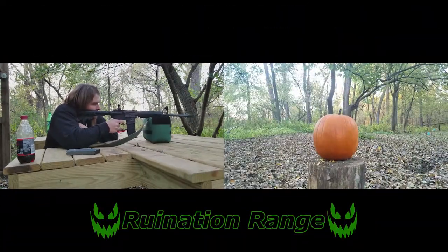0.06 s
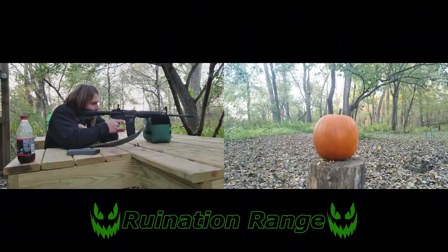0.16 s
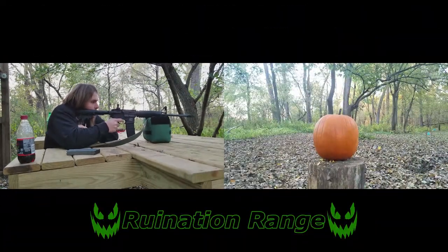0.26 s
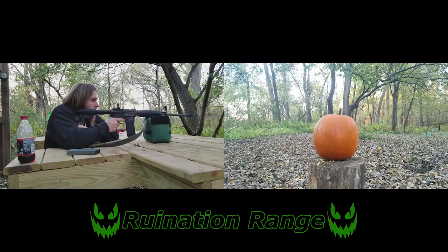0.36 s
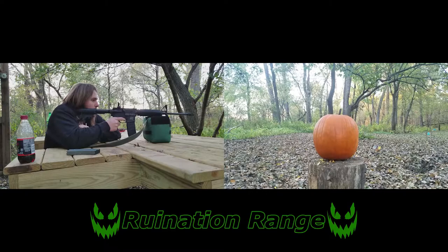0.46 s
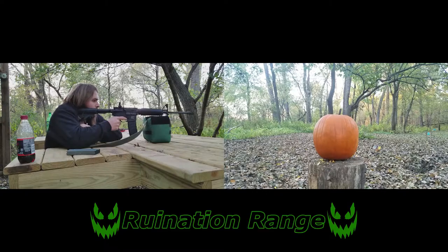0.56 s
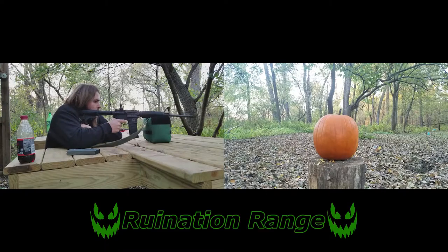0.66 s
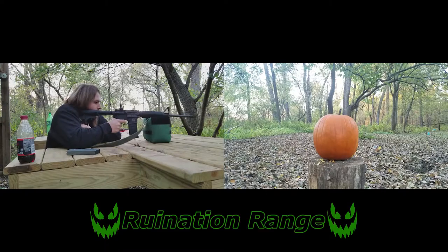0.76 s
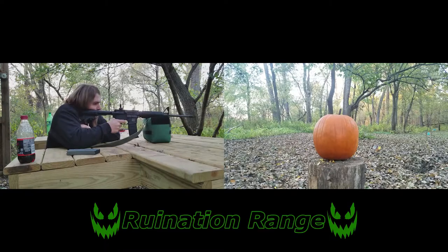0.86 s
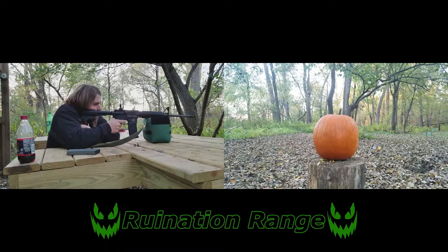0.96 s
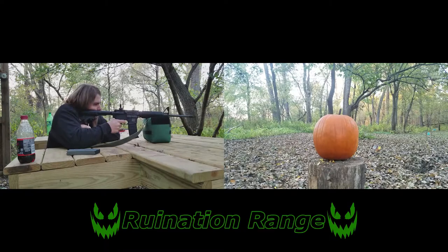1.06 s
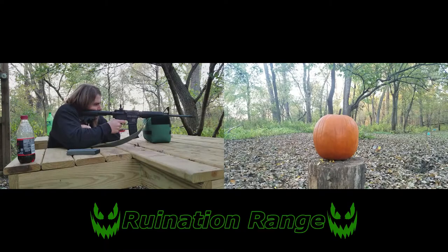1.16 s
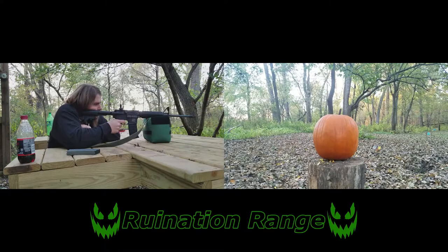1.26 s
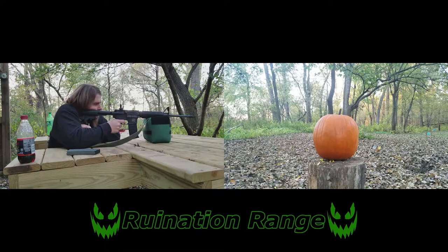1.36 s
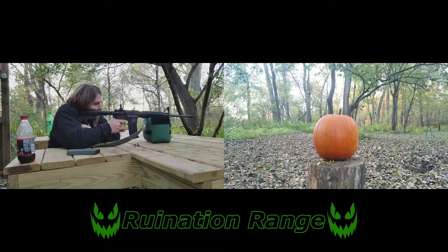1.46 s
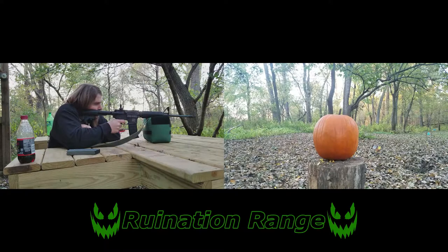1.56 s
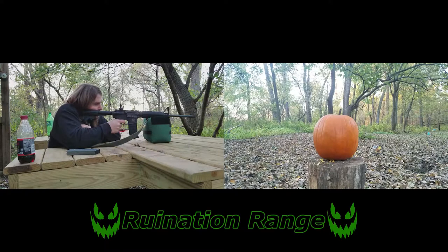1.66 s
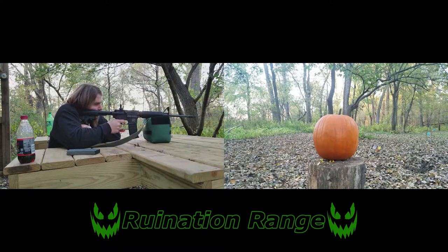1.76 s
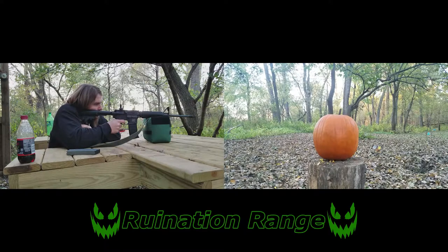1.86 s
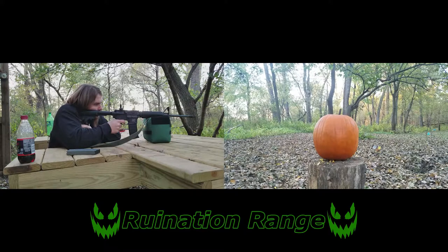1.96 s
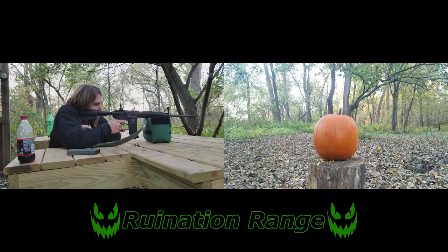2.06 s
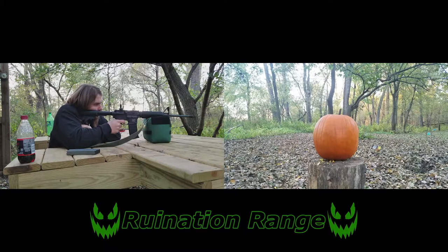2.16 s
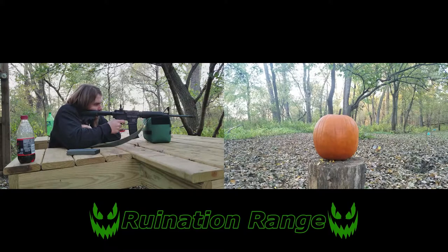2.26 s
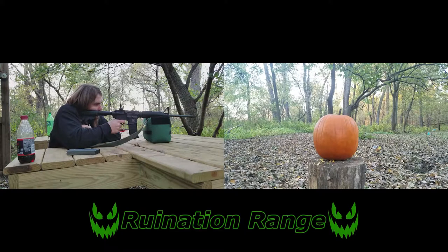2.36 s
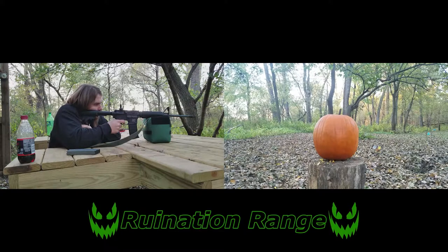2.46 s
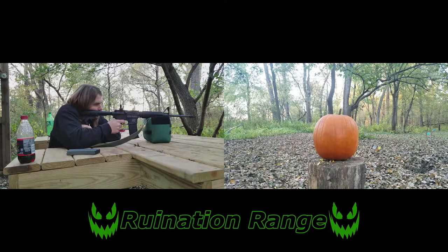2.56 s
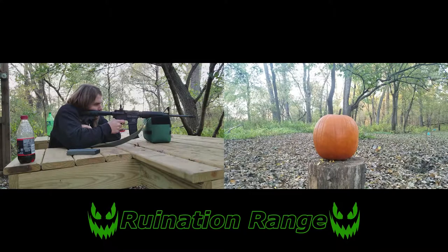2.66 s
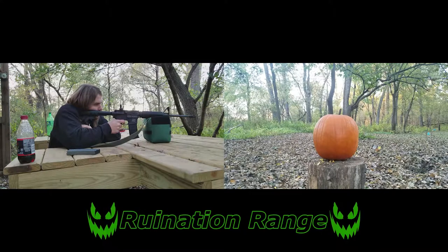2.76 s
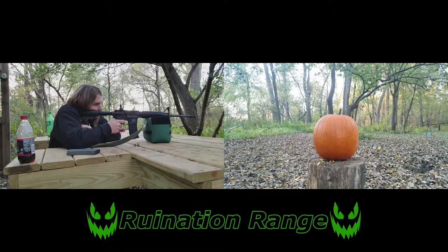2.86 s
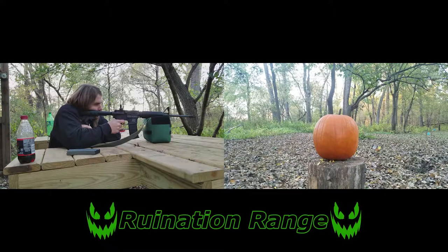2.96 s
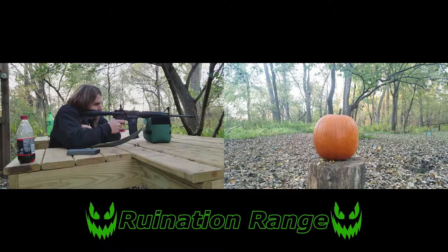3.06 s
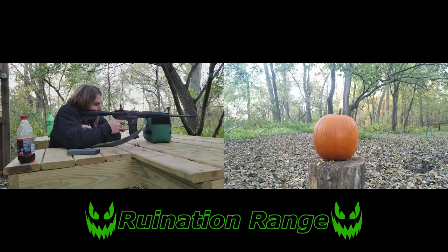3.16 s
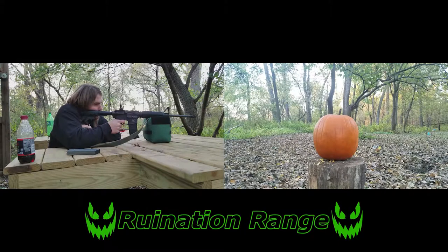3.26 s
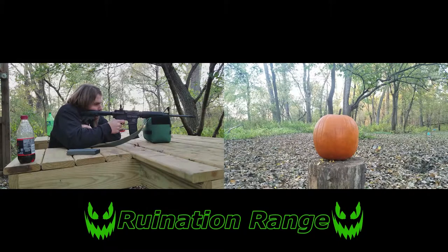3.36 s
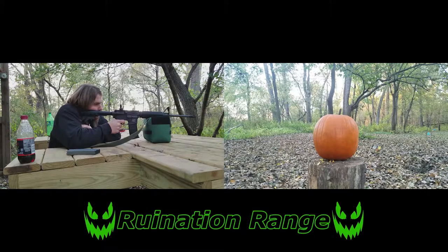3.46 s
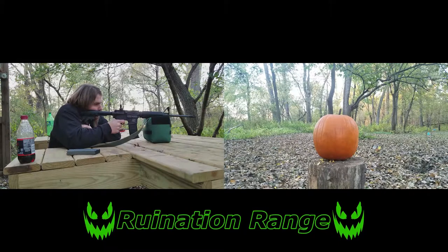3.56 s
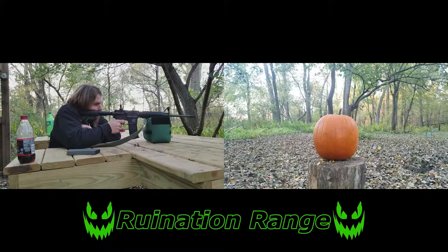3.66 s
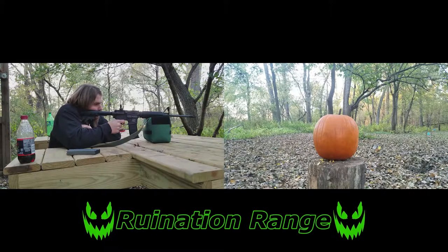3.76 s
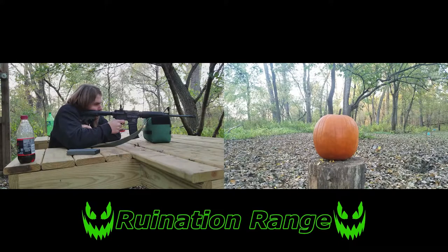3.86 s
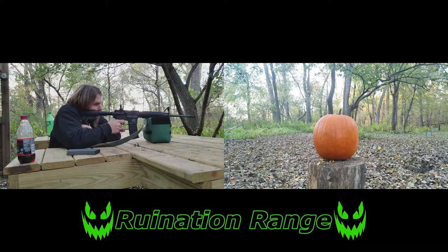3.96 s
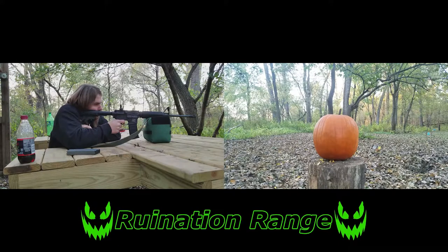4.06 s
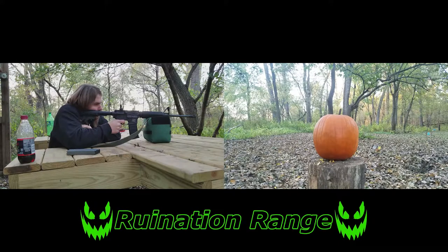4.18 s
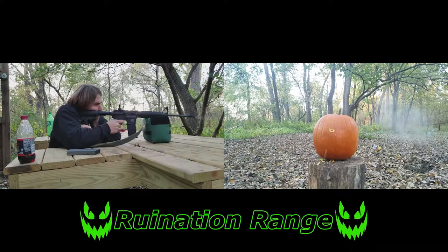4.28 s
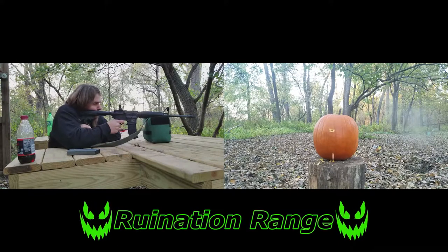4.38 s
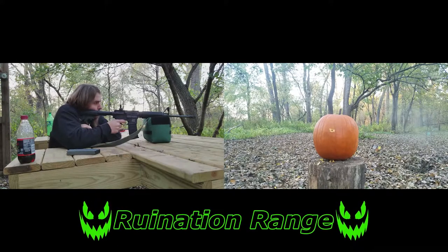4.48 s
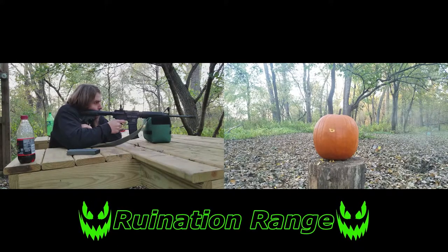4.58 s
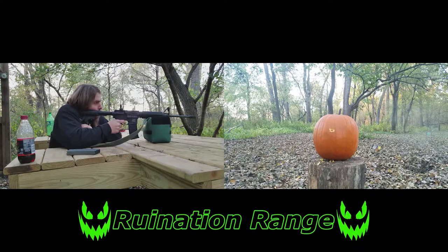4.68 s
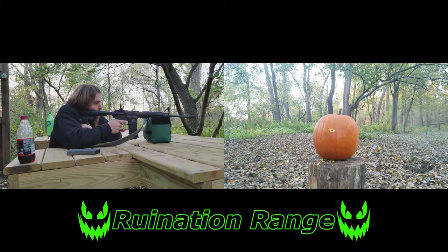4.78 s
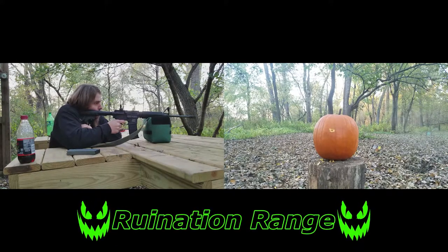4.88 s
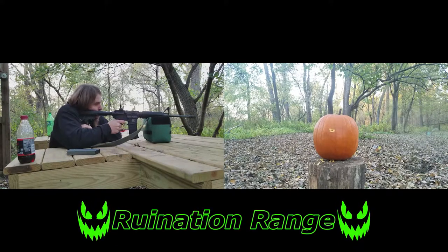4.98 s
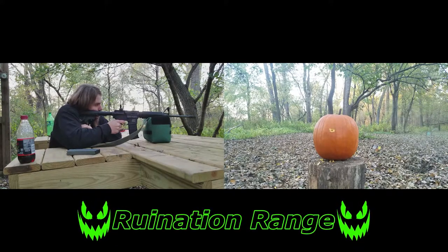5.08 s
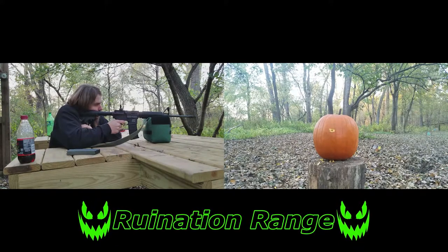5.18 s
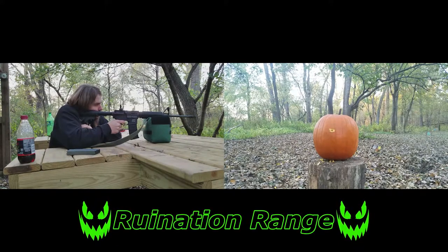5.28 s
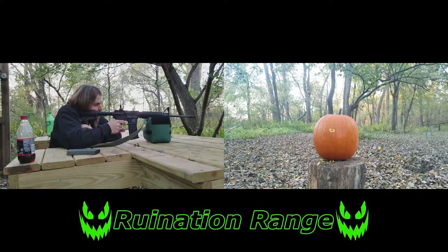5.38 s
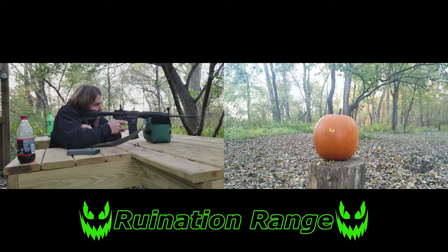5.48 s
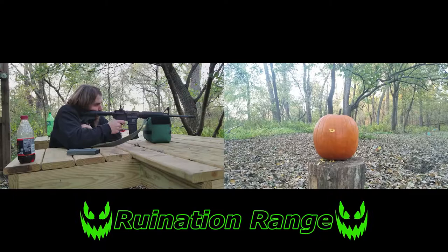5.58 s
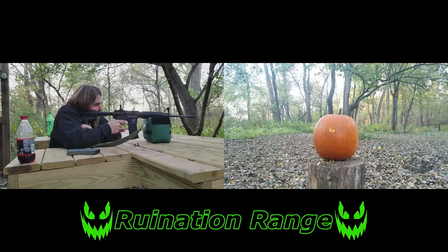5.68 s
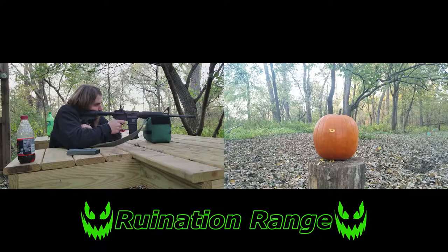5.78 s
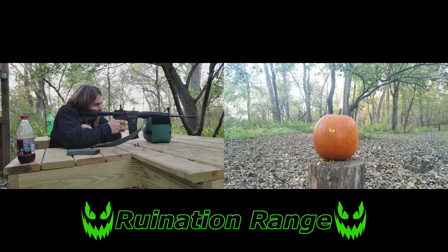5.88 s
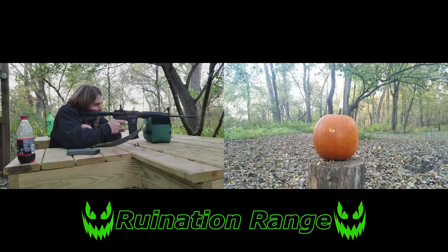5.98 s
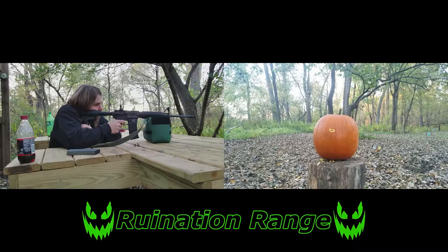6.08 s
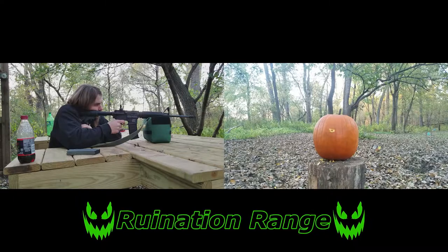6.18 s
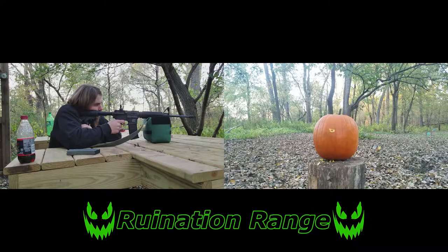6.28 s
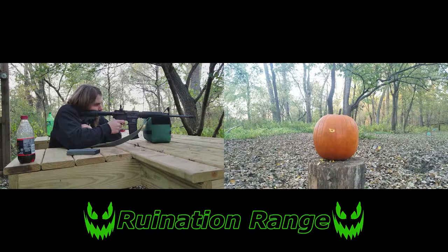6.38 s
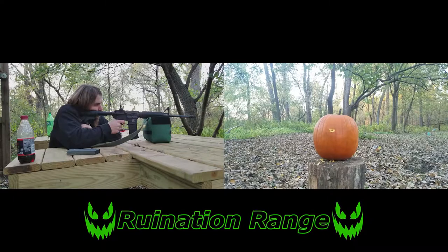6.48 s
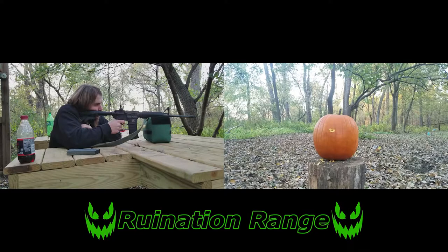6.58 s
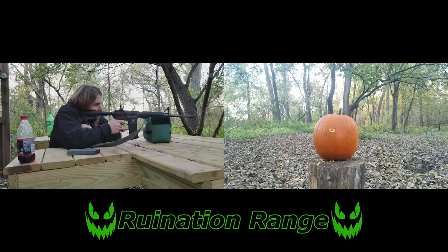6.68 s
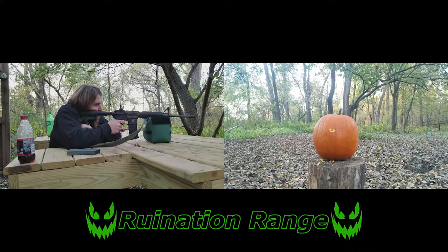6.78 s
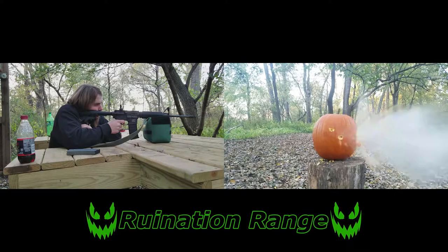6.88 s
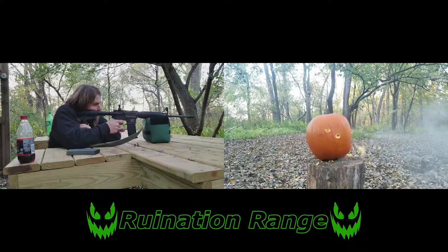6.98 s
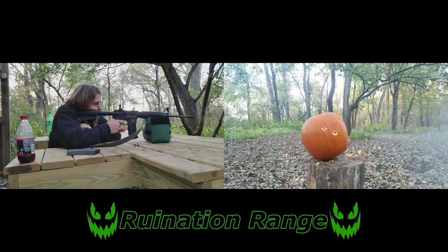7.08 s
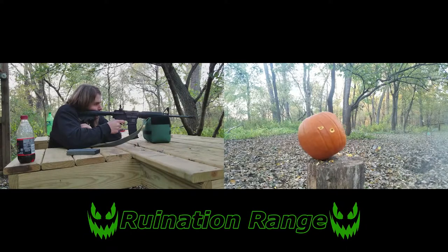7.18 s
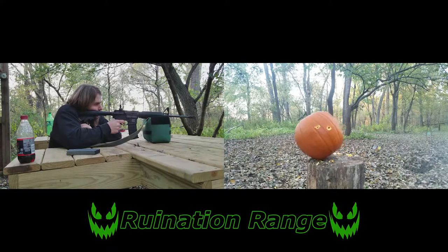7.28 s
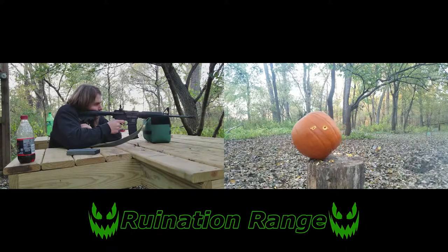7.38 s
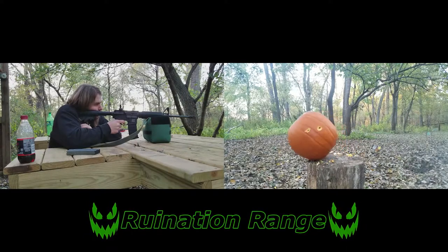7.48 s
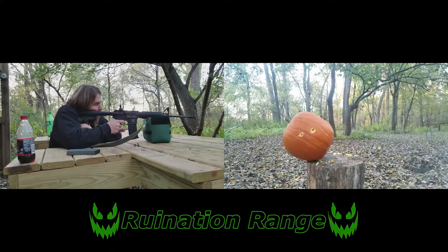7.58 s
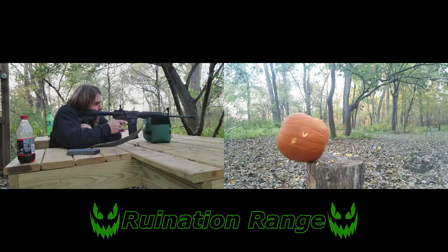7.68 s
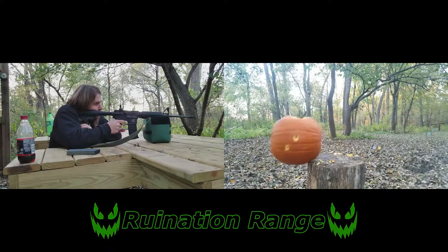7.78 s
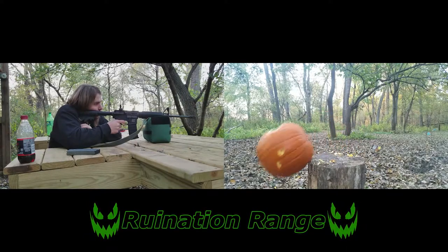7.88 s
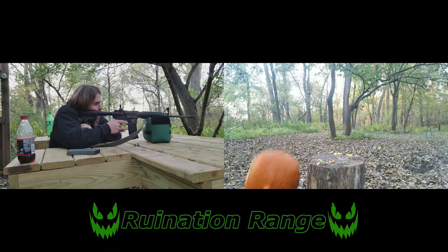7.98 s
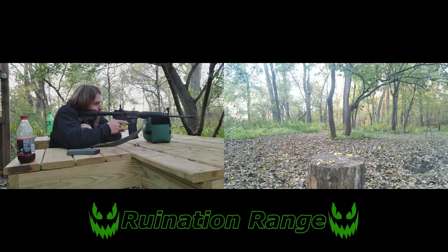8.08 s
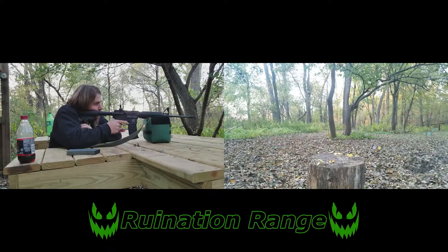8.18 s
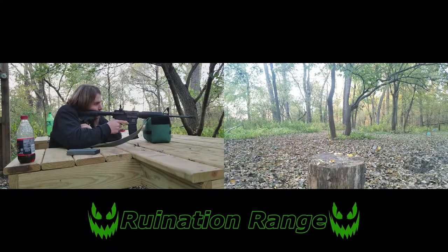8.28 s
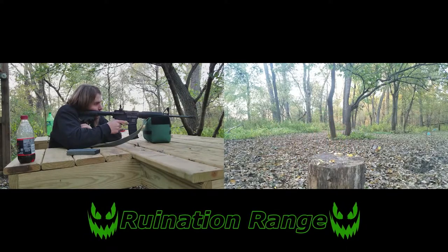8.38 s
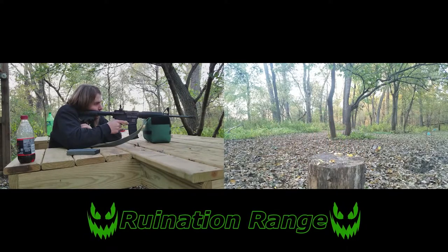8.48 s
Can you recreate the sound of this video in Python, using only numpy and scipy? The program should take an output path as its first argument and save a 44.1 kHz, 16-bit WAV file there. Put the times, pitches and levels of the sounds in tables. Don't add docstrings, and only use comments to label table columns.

```python
import sys
import numpy as np
from scipy import signal
from scipy.fft import rfft, irfft, next_fast_len
from scipy.io import wavfile
from scipy.ndimage import uniform_filter1d

SR = 44100
rng = np.random.default_rng(int(sys.argv[2]) if len(sys.argv) > 2 else 0)


def unload_audio(sound):
    columns = np.transpose(np.atleast_2d(sound))
    steps = np.round(np.clip(columns, -1, 1) * 32767)
    wavfile.write(sys.argv[1], SR, steps.astype(np.int16))


def undo_db(level):
    steps = np.asarray(level, float) / 20
    return 10 ** steps


N = 376481
TIME = np.arange(N) / SR
BURST = 2 ** 14

# start_s, level_db
SHOT_TIMES = [
    (4.2604, 0.5),
    (6.9104, 0.5),
]


def on_log(table, hz):
    f, v = np.transpose(table)
    return np.interp(np.log(hz), np.log(f), v)


def spectrum(size, table=((1, 0), (2, 0))):
    size = next_fast_len(size)
    hz = np.maximum(np.fft.rfftfreq(size, 1 / SR), 1)
    return rfft(rng.standard_normal(size)) * undo_db(on_log(table, hz))


def band(spec, hz, size, octaves=1 / 2):
    padded = next_fast_len(size)
    f = np.maximum(np.fft.rfftfreq(padded, 1 / SR), 1)
    shape = np.cos(np.pi / 2 * np.clip(np.log2(f / hz) / octaves, -1, 1)) ** 2
    return irfft(spec * shape, padded)[..., :size]


def level(x, db):
    return x * undo_db(db) / np.sqrt(np.mean(x ** 2))


def walk(rate):
    k = int(SR / rate)
    steps = np.repeat(rng.standard_normal(N // k + 1), k)
    return 1.6 * uniform_filter1d(uniform_filter1d(steps, k), k)[:N]


def swells(at, db, rise, fall, t, held=0):
    below = rise * np.maximum(at - t, 0) + fall * np.maximum(t - at - held, 0)
    return undo_db(np.maximum(db - below, -200))


def ring(hz, t60):
    t = TIME[:BURST]
    return np.sin(2 * np.pi * hz * t) * undo_db(-60 * t / t60)


def puff(hz, t60, octaves):
    t = TIME[:BURST]
    noise = level(band(spectrum(BURST), hz, BURST, octaves), -0.81)
    return noise * undo_db(-60 * t / t60) * np.minimum(t * hz / 1.5, 1)


def add(out, s, x):
    i = int(s * SR)
    out[i:i + len(x)] += x[:N - i]


def gain_control():
    duck_db, creep_db_per_s, release_s, release_db_per_s = -21, 5, 1.08, 27
    total_db = np.zeros(N)
    for s, _ in SHOT_TIMES:
        t = TIME - s
        back_db = duck_db + creep_db_per_s * t + release_db_per_s * np.maximum(t - release_s, 0)
        total_db += (t > 0) * np.minimum(back_db, 0)
    return undo_db(total_db)


def bird():
    start_s, length_s, pitch_hz, sag_hz_per_s, level_db, fade_db_per_s = 2.692, .17, 5600, 700, -73, 100
    swell = swells(start_s, level_db, 900, fade_db_per_s, TIME) * (TIME < start_s + length_s)
    flutter = undo_db(2.2 * walk(150))
    hz = pitch_hz - sag_hz_per_s * (TIME - start_s) + 35 * walk(120)
    return swell * flutter * np.sin(2 * np.pi * np.cumsum(hz) / SR)


def ambience():
    # frequency_hz, density_db (per Hz)
    air_colour = [(20, -22.5), (40, -10), (65, -0.5), (110, -4), (160, -11), (250, -19), (400, -22),
                  (700, -30.5), (1100, -35.5), (2000, -37), (3200, -37.5), (5000, -38), (9000, -37),
                  (15500, -36.5)]
    # frequency_hz, width_hz, level_db
    hum_lines = [(104, 3.4, -71.5), (193, 4.7, -79.5)]
    spec, swell = spectrum(N, air_colour), walk(0.53)
    out = irfft(spec)[:N]
    for hz in [40, 80, 160, 320, 640]:
        out += (undo_db(.6 * swell + 1.4 * walk(6)) - 1) * band(spec, hz, N, octaves=0.61)
    out = level(out, -63)
    for hz, width_hz, db in hum_lines:
        out += level(band(spectrum(N), hz, N, octaves=width_hz / hz), db)
    return (out + bird()) * gain_control()


def loudest(rows, rise, fall):
    return np.max([swells(s, db, rise, fall, TIME, held) for s, held, db in rows], axis=0)


def rustle():
    # frequency_hz, density_db (per Hz)
    cloth_colour = [(880, -51), (1500, -15.5), (2080, -11.5), (2550, -2), (3150, -0.5), (3860, -8.5),
                    (4290, -8), (8020, -12), (15000, -32)]
    # frequency_hz, density_db (per Hz)
    debris_colour = [(1500, -40.5), (2500, -12.5), (2830, 0), (3200, -1.5), (5000, -12.5), (7100, -15),
                     (10000, -22), (12500, -35.5), (15500, -49.5)]
    # start_s, held_s, crackle_db, dull_rub_db
    sleeve_moves = [(0, .045, -58, -54.5), (.15, 0.056, -68, -77), (.25, .16, -73, -75),
                    (.435, 0.057, -56, -65.5), (.56, 0.07, -76, -65), (.69, 0.022, -61, -60),
                    (.765, .03, -64.5, -59), (.84, .05, -67.5, -59), (.9, 0.028, -72, -63),
                    (.97, .06, -88, -68)]
    # start_s, held_s, level_db
    debris_showers = [(5.1, .03, -67), (5.15, .45, -74.5), (5.61, .62, -68), (6.34, .02, -74),
                      (5.68, 0.061, -66), (5.836, .03, -61), (5.918, .05, -63.5), (6.0, .03, -63),
                      (6.13, .06, -64.5), (6.21, 0.027, -65), (6.476, .03, -76), (6.69, .01, -78),
                      (7.708, .05, -64), (8.016, .01, -71), (8.08, .4, -70.5), (8.184, .04, -62.5),
                      (8.356, .08, -65.5), (8.47, 0.031, -58)]
    grain = 64
    sizes = undo_db(1.1 * rng.exponential(size=N // grain + 1))
    crackle = uniform_filter1d(sizes.repeat(grain)[:N], size=grain) * undo_db(1.1 * walk(24))
    cloth = level(crackle * irfft(spectrum(N, cloth_colour))[:N], 0)
    debris = level(crackle * irfft(spectrum(N, debris_colour))[:N], 0)
    rub = level(band(spectrum(N), 410, N, octaves=2.56), -1.5)
    moves = np.array(sleeve_moves)
    out = loudest(moves[:, [0, 1, 2]], 300, 260) * cloth
    out += loudest(moves[:, [0, 1, 3]], 300, 260) * rub
    return out + loudest(debris_showers, 600, 110) * debris


def knocks():
    # start_s, peak_db, pitch_hz, t60_s
    tick_events = [(.343, -54, 7400, .02), (0.488, -52, 2550, 0.026), (0.873, -54, 3000, .02),
                   (2.488, -52, 2900, .03), (5.049, -62, 6500, .02), (5.094, -43.5, 3770, 0.054),
                   (5.095, -53.5, 8400, 0.033), (2.489, -66, 6000, .015), (2.655, -68, 3302, 0.022),
                   (5.134, -60, 6450, 0.018), (5.224, -63, 7500, 0.019), (5.31, -52, 2940, 0.03),
                   (5.333, -42.5, 3050, 0.027), (5.332, -54.5, 7750, 0.023), (5.684, -59, 3000, 0.018),
                   (5.72, -55, 3010, 0.018), (5.92, -48, 3200, .025), (6.004, -48, 2740, .03),
                   (6.478, -63, 3540, 0.032), (6.495, -65, 3300, .03), (6.69, -69.5, 3600, 0.031),
                   (7.43, -47, 7060, 0.02), (7.432, -44, 4000, .02), (7.765, -63, 7000, .02),
                   (7.797, -62, 6200, .02), (.3445, -55, 2800, .012), (8.087, -55, 3800, 0.023),
                   (8.47, -51, 3300, 0.017)]
    # start_s, peak_db, pitch_hz, t60_s
    tap_events = [(.084, -60, 584, .05), (.724, -45, 1400, .04), (.774, -51, 1560, 0.039),
                  (.835, -48, 532, 0.14), (.854, -45, 518, 0.075), (.84, -51, 950, .12),
                  (.874, -60, 987, 0.24), (2.488, -60.5, 720, 0.071), (2.489, -58, 1490, .03),
                  (3.409, -66, 850, .05), (6.003, -55, 1690, .03), (7.954, -50, 820, 0.046)]
    # start_s, peak_db, pitch_hz, t60_s
    thud_events = [
        (.628, -38.5, 124, .08),
        (0.654, -41, 107.3, 0.32),
        (.65, -45, 324, 0.19),
        (8.194, -45, 151, 0.14),
        (8.246, -45.5, 189, 0.085),
        (8.279, -51, 152, .08),
        (8.521, -53, 177.5, 0.083),
    ]
    bench_mode = 1.9
    out = np.zeros(N)
    for s, db, hz, t60 in tick_events:
        add(out, s, undo_db(db) * (0.9 * ring(hz, .7 * t60) + 0.4 * puff(hz, 1.3 * t60, octaves=0.89)))
    for s, db, hz, t60 in tap_events:
        wood = ring(hz, t60) + .5 * ring(bench_mode * hz, t60)
        add(out, s, undo_db(db - 2.5) * (wood + 0.35 * puff(1.3 * hz, t60, octaves=.9)))
    for s, db, hz, t60 in thud_events:
        body = ring(hz, t60) + 0.56 * ring(1.6 * hz, t60)
        add(out, s, undo_db(db) * (body + 0.71 * puff(1.1 * hz, t60, octaves=1.2)))
    return out


def latch():
    # frequency_hz, level_db, t60_s
    receiver_modes = [(725, -4, 0.07), (1123, -13, 0.047), (1504, -2, 0.051), (2621, -4, 0.025),
                      (3050, -12.5, 0.2), (4000, -9.5, 0.08), (4230, -8.5, 0.025), (4900, -19.5, 0.071),
                      (6900, -17.5, 0.044), (11820, -37, 0.093)]
    # start_s, level_db
    blows = [
        (0.626, -51.5),
        (0.6295, -24),
        (0.6316, -9.5),
        (0.6352, -21.5),
        (0.6383, -23),
        (.6395, -31.5),
    ]
    rebound_dull = .6
    main_s, main_db = blows[2]
    out = np.zeros(N)
    for s, db in blows:
        for hz, mode_db, t60 in receiver_modes:
            add(out, s, rng.choice([-1, 1]) * undo_db(db - 11 + mode_db) * ring(hz, 0.52 * t60))
        edge_db = db - rebound_dull * (main_db - db) * (s > main_s)
        add(out, s, undo_db(db - 8) * puff(2100, 0.0093, octaves=1.0))
        add(out, s, undo_db(edge_db - 1) * ring(2700, .008) + undo_db(edge_db - 6) * ring(7000, 0.0051))
        add(out, s, undo_db(edge_db - 19) * ring(9500, 0.003) + undo_db(edge_db - 14) * puff(12000, .006, octaves=0.43))
    for hz, db in [(800, -47.5), (1700, -43.0), (3600, -36), (5000, -49), (9000, -60.0)]:
        add(out, .632, undo_db(db) * puff(hz, 0.2055, octaves=1.1))
    return out


def echo_level(t):
    crack = undo_db(18 - 400 * t)
    trunks = swells(.2, -5.5, 0, 100, t)
    wood = undo_db(-8.5 - 46.5 * t)
    treeline = swells(1.59, -55, 12, 28.5, t)
    return np.sqrt(crack ** 2 + trunks ** 2 + wood ** 2 + treeline ** 2)


def woodland_echoes(t):
    # frequency_hz, density_db (per Hz)
    echo_colour = [(25, -46.5), (60, -14.5), (110, -10.5), (190, -10.5), (250, -4.5), (350, -4.5),
                   (550, -2), (900, -7.5), (1500, -10.5), (2300, -13), (3150, -8.5), (4300, -22.5),
                   (6500, -34), (10000, -43), (15500, -51)]
    # frequency_hz, loss_db_per_s
    air_loss = [(100, 0), (700, -2), (1000, -0.5), (1400, 2), (2100, 8), (3200, 22), (5000, 34),
                (8000, 47.5), (14000, 66.5)]
    # frequency_hz, likeness (0-1)
    likeness = [(300, 0.98), (1000, .92), (3000, 0.9), (8000, 0)]
    # after_blast_s, boost_db
    stands = [
        (.04, 4),
        (.18, 4),
        (.26, 8),
        (.33, 4),
    ]
    stand_width_s, stand_top_hz = .012, 950
    size = len(t)
    same = spectrum(size, echo_colour)
    alike = np.clip(on_log(likeness, np.linspace(1, SR / 2, len(same))), 0, 1)
    both = np.array([np.sqrt(alike) * same + np.sqrt(1 - alike) * spectrum(size, echo_colour)
                     for _ in SHOT_TIMES])
    path = t - .39 + 3.2 * np.maximum(t - 1.6, 0)
    path -= 0.09 * np.maximum(.3 - t, 0)
    stands_db = sum(db * np.exp(-((t - s) / stand_width_s) ** 2) for s, db in stands)
    echoes = np.zeros((len(SHOT_TIMES), size))
    for hz in 22 * 2 ** (np.arange(20) / 2):
        boost_db = stands_db / (1 + (hz / stand_top_hz) ** 4)
        echoes += undo_db(boost_db - on_log(air_loss, hz) * path) * band(both, hz, size)
    echoes *= undo_db(2.5) / np.sqrt(np.mean(echoes[:, SR // 4:SR // 2] ** 2))
    return echo_level(t) * echoes


def blast_pressure(t):
    peak, build_s, flip_s, relax_s = 7.3, .0075, .0035, 0.022
    flip = 1 - 2 * np.clip((t - build_s) / flip_s, 0, 1)
    relax = np.exp(-(np.maximum(t - build_s - flip_s, 0) / relax_s) ** 2)
    return peak * np.minimum(t / build_s, 1) ** 2 * flip * relax


def shots():
    hammer_s, bolt_s = -.0073, .0548
    out = np.zeros(N)
    t = TIME[:int(2.64 * SR)]
    push = blast_pressure(t)
    for (s, db), echo in zip(SHOT_TIMES, woodland_echoes(t)):
        add(out, s, undo_db(db) * (echo + push))
        add(out, s + hammer_s, undo_db(-13) * ring(3000, 0.0094) + undo_db(-14.5) * puff(6900, 0.013, octaves=1.2))
        add(out, s - .003, undo_db(-22.5) * puff(2400, .008, octaves=1.1)[128::-1])
        add(out, s + bolt_s, undo_db(9.5) * ring(6500, 0.016) + undo_db(4) * puff(12500, 0.016, octaves=.4))
    add(out, 4.543, undo_db(-36.5) * ring(15000, .2))
    return out


def capsule(pressure):
    held = np.tanh(pressure)
    for hz, kind in [(58, "high"), (90, "high"), (9000, "low")]:
        held = signal.lfilter(*signal.butter(1, hz, kind, fs=SR), held)
    return np.clip(held, -1.03, 1.03)


def scene():
    return (ambience() + rustle() + knocks() + latch() + capsule(shots()))[None]


def band_limit(x):
    return signal.sosfilt(signal.butter(12, 15660, fs=SR, output="sos"), x)


def record(dry):
    return band_limit(dry)


dry = scene()
out = record(dry)
unload_audio(out)
```